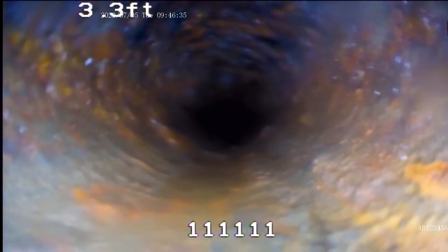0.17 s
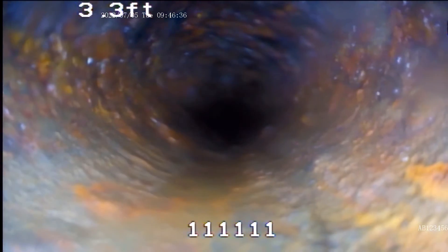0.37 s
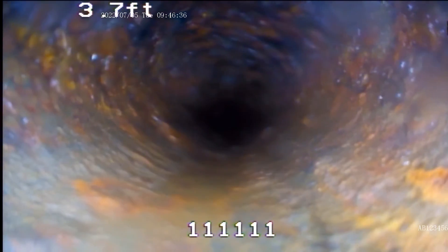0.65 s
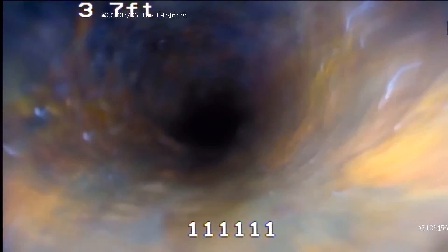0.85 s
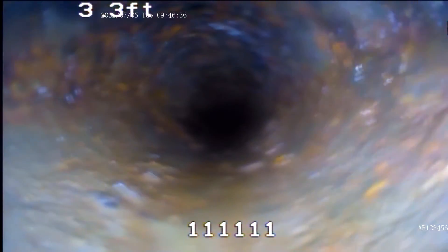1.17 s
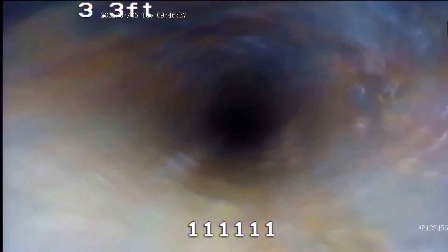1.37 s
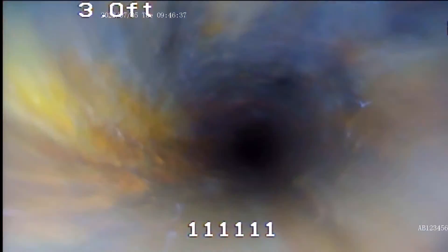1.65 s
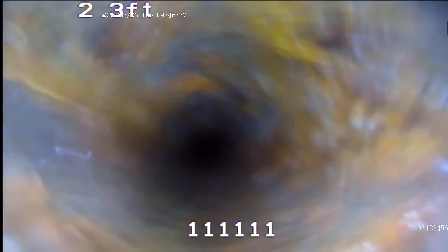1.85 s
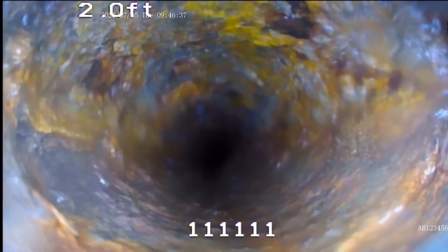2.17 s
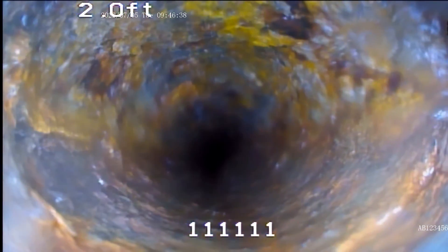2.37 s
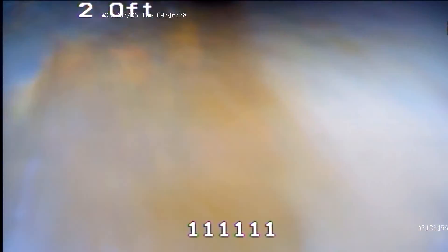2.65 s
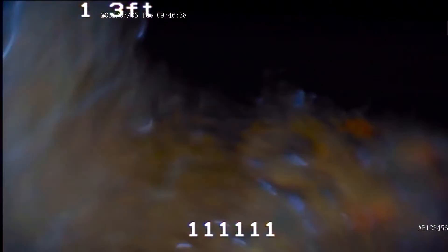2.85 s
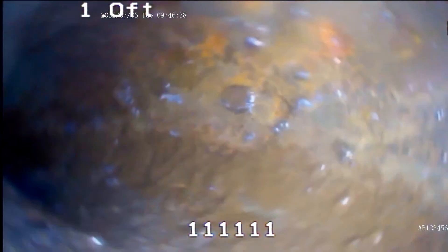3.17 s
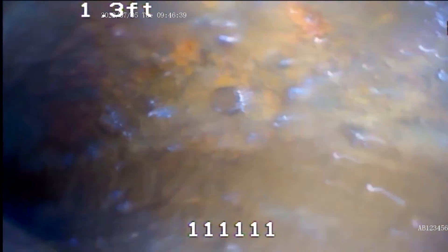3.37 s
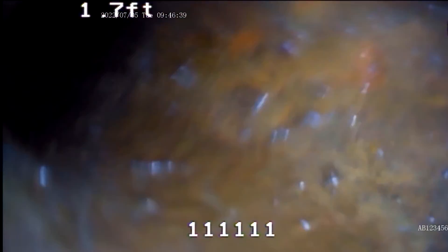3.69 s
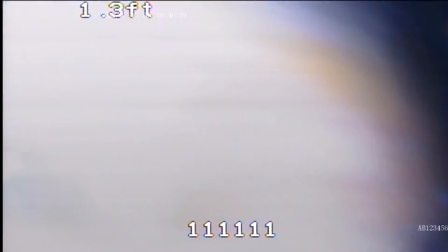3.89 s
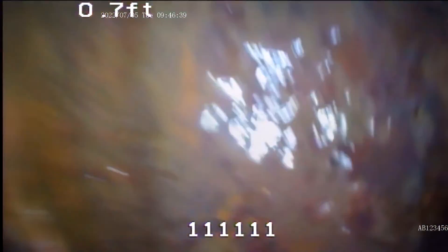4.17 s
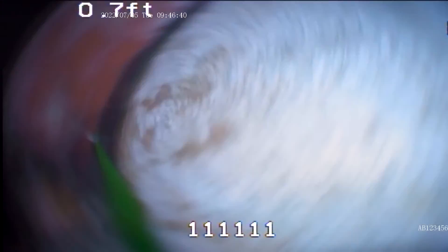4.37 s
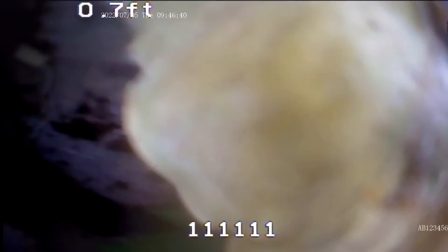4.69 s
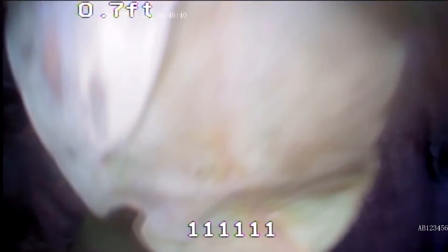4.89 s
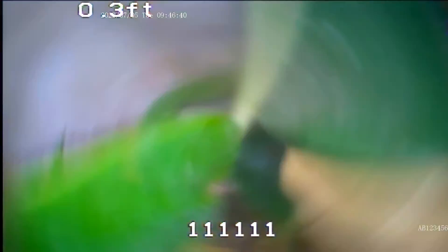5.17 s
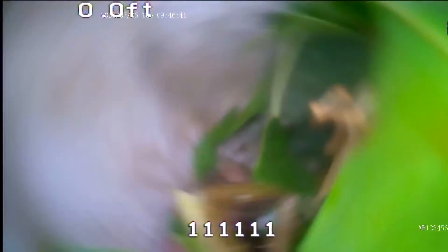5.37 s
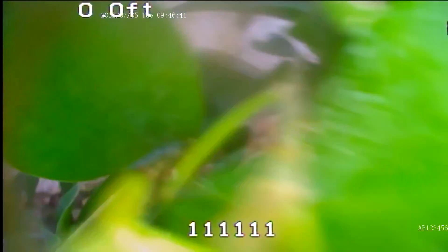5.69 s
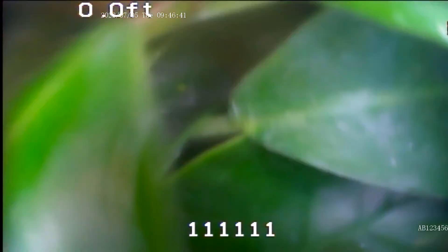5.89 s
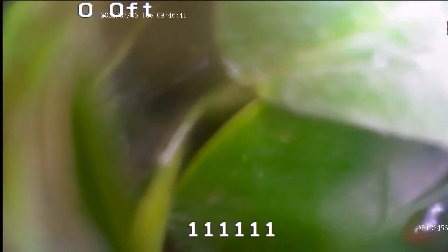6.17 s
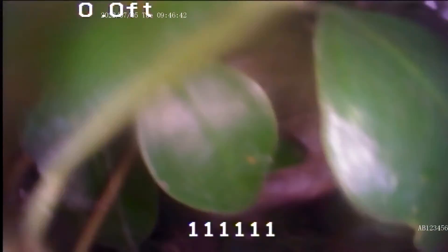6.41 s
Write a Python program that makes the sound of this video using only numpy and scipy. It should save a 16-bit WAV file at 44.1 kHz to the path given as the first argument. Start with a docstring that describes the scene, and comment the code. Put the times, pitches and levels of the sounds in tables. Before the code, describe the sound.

A stiff inspection cable is hauled from a drain pipe onto its reel in uneven strokes, each speeding up and slowing with a dull rub and gritty scrape. The reel rumbles and its frame rings lightly. Strong pulls open the sound, with a soft, low, wavering friction drone, and a hollow knock follows at 0.7 seconds. At 1.2 seconds everything cuts out for a tenth of a second, with a pop at each edge. Another strong scrape comes near 1.8 seconds, and the drone returns on and off until about 4.2. Slack loops knock and shudder against the frame, loudest around 2.8 and 3.9 seconds, with a quick clatter from 4.3 to 4.5 and lighter knocks around 5. Longer, smoother rubbing and rumbling run from 5 to 6 seconds, then settle, with one small scrape at 6.5. Faint monitor hiss and a very thin whine lie underneath.

```python
"""At a drain pipe, a stiff inspection cable is hauled out in strokes, back onto its reel.
Each pull speeds up, holds and slows, rubbing and scraping through the guide and bowing the reel
into a drone. The reel rumbles as it turns, its frame rings, and slack loops knock against it
and shudder. The monitor adds faint hiss and a thin whine; once, the sound cuts out for a moment."""
import sys
import numpy as np
from scipy import signal
from scipy.fft import rfft, irfft
from scipy.io import wavfile
from scipy.ndimage import uniform_filter1d

SR = 44100
rng = np.random.default_rng(int(sys.argv[2]) if len(sys.argv) > 2 else 0)


def inscribe(sig):
    """Save sig as 16-bit PCM at rate SR to the path in sys.argv[1].

    A 1-D sig is mono; a 2-D sig holds one channel per row.
    Samples are clipped to [-1, 1] before scaling.
    """
    pcm = np.round(np.clip(np.atleast_2d(sig).T, -1, 1) * 32767)
    wavfile.write(sys.argv[1], SR, pcm.astype(np.int16))


N = 288414
TIME = np.arange(N) / SR
CONTROL_TIME = np.arange(0, N / SR + .002, .002)  # coarse grid for envelopes

# Pulls through the guide; levels are relative within each layer:
# full speed at t/s, rise/s, hold/s, fall/s, rub/dB, scrape/dB, hiss/dB, ring/dB
PULLS = [(0.033, 0.048, 0.062, 0.13, -33.5, -33, -60, -44.5),
         (0.22, 0.18, 0.14, 0.14, -44.5, -61.5, -81, -65),
         (0.42, 0.086, 0.055, 0.12, -41, -44, -74.5, -57.5),
         (0.51, 0.1, 0.034, 0.13, -34, -46.5, -70.5, -44.5),
         (0.712, 0.069, 0.027, 0.5, -36, -55, -75.5, -63),
         (1.12, 0.19, 0.016, 0.19, -40.5, -50, -71, -56.5), (1.32, .1, 0.13, 0.36, -44, -57, -77, -55.5),
         (1.778, .24, 0.073, 0.076, -35, -40.5, -66.5, -55),
         (1.93, .1, 0.011, 0.46, -49, -56.5, -79, -65.5), (2.38, 0.11, 0.061, 0.15, -51, -59.5, -97, -67),
         (2.82, 0.21, 0.15, 0.064, -46, -46, -71, -50), (3.164, .05, 0.021, 0.22, -49.5, -73, -92, -75),
         (3.4, 0.066, 0.04, 0.16, -37, -44.5, -64.5, -58),
         (3.763, 0.1, .12, 0.18, -47.5, -55.5, -78, -70.5),
         (3.964, .05, 0.053, 0.19, -41.5, -49.5, -77.5, -53.5),
         (4.32, 0.23, 0.12, 0.24, -39.5, -52, -71.5, -57),
         (4.657, .08, 0.046, 0.059, -45.5, -65.5, -80.5, -74),
         (5.085, 0.27, 0.55, 0.21, -42.5, -60, -78, -59.5),
         (5.542, 0.32, 0.25, 0.14, -39, -55.5, -74.5, -63),
         (6.19, 0.092, 0.047, 0.32, -61, -94.5, -99, -73),
         (6.53, 0.02, 0.022, 0.11, -63, -54.5, -70.5, -63)]
# Slack loops hitting the frame, relative levels: t/s, thud/dB, clack/dB, tick/dB, hollow note f/Hz
KNOCKS = [(0.699, -46.5, -43.5, -71, 426), (0.709, -32.5, -34, -46, 368), (1.433, -38.5, -48, -72, 466),
          (1.463, -45, -34.5, -55.5, 247), (2.041, -53, -48, -90, 322), (2.384, -36, -46, -67, 405),
          (2.419, -27.5, -28.5, -37.5, 490), (2.827, -20.5, -23.5, -36, 540),
          (2.948, -24.5, -36.5, -54, 403), (2.982, -30, -58, -78, 408), (3.0, -30.5, -39, -71, 363),
          (3.125, -41, -48.5, -65, 250.3), (3.329, -35, -43.5, -66, 470), (3.375, -51, -40.5, -78, 364.6),
          (3.387, -32, -35, -48, 293), (3.814, -64.5, -64, -62.5, 404), (3.917, -39, -37, -58.5, 448),
          (3.926, -23, -22.5, -39.5, 516), (3.949, -30, -37, -43.5, 490), (3.956, -26, -32, -65, 520),
          (4.093, -47, -50.5, -64, 400), (4.126, -49, -48.5, -69, 282), (4.155, -32.5, -61, -76, 275),
          (4.29, -39, -46.5, -79, 486), (4.338, -30, -35.5, -72, 524), (4.352, -32, -25.5, -40.5, 480),
          (4.361, -51, -31, -44.5, 400), (4.387, -27.5, -45, -45.5, 463), (4.422, -36.5, -36, -71, 466),
          (4.443, -33, -38, -52, 544), (4.455, -29, -40.5, -52, 540), (4.552, -37.5, -52.5, -66.5, 424),
          (4.963, -38.5, -41, -69, 412), (5.001, -55, -48, -84, 460), (5.056, -38, -46.5, -87, 420),
          (5.082, -31, -38.5, -66, 520), (5.194, -33, -53, -75, 433), (5.249, -35.5, -45, -72.5, 516),
          (6.169, -59.5, -71.5, -96, 330)]
# Broad body tone of cable and frame: f/Hz, gain/dB
BODY_TONE = [(25, -29), (50, -23), (70, -6.5), (92, 0), (135, -10), (220, -8.5), (520, -14.5), (680, -22.5),
             (850, -23), (1080, -20), (1600, -26), (2400, -30.5), (3300, -35), (4200, -45), (8000, -58.5),
             (13000, -71.5)]


def cable_drag(rumble, rub, scrape, hiss):
    """Slips of the cable shake the frame: slow bumps rumble and rub, fine dense grit scrapes."""
    # Scrape spectrum of the cable jacket in the guide: f/Hz, gain/dB
    jacket_tone = [(800, 0), (1050, -7), (1330, 4.5), (1700, 1), (2200, -6), (2450, -10.5), (3300, -16),
                   (4000, -21.5), (4900, -27.5), (5700, -28), (7400, -35.5), (9000, -36.5), (13000, -49.5)]
    bumps = slips(per_s=300, spread_db=0.26, smooth=1.0)
    bumps = signal.oaconvolve(bumps, frame_response(BODY_TONE, ring_db=-1))[:N]
    bumps = sliding_contact(bumps, depth_db=3, size=4096)
    grit = slips(per_s=2600, spread_db=2.8, smooth=.8) * amp(1.3 * wander(35))
    grit = signal.oaconvolve(grit, frame_response(jacket_tone, ring_db=-2))[:N]
    grit = sliding_contact(grit, depth_db=2.8, size=2048)
    rasp = hiss * np.sqrt(hiss / amp(-57))  # comes forward on the hardest pulls
    out = amp(2.6) * rumble * steadied(band(bumps, 67, 190), 0.074)
    out += amp(-1.0) * rub * steadied(band(bumps, 248, 661, order=4), 0.26)
    out += amp(-1.6) * scrape * steadied(band(grit, 750, 3900, order=4), 0.17)
    out += amp(-0.5) * rasp * steadied(band(grit, 4400, 5400), 0.12)
    return out + amp(-0.5) * hiss * steadied(band(grit, 4500, 15000), 0.54)


def drag_envelopes(let_go_s=6.04, settle_db_per_s=37.5):
    """Pulls, reel turns and knocks drive the levels of rumble, rub, scrape and hiss."""
    # Reel turns taking up the slack: full speed at t/s, rise/s, hold/s, fall/s, relative rumble/dB
    reel_turns = [(0.215, 0.14, 0.21, 0.21, -37), (0.584, 0.053, 0.04, 0.15, -33),
                  (0.955, 0.24, 0.44, .25, -34.5), (1.584, 0.065, 0.072, 0.28, -36.5),
                  (2.995, 0.058, 0.043, 0.087, -42), (3.41, 0.16, 0.09, 0.26, -44),
                  (4.797, 0.019, 0.011, 0.038, -46.5), (5.292, 0.24, 0.29, .12, -34),
                  (5.551, 0.082, 0.27, .15, -33.5)]
    rub_db, scrape_db, hiss_db = np.transpose(PULLS)[4:7]
    thud_db, clack_db = np.transpose(KNOCKS)[1:3]
    # The frame trembles for as long as the cable is handled.
    tremor = amp(-55 - settle_db_per_s * np.maximum(TIME - let_go_s, 0))
    rolling = swells(reel_turns, np.transpose(reel_turns)[-1])
    low_shake = shudder(thud_db - 9.5, build_s=0.035, decay_db_per_s=94)
    mid_shake = shudder(thud_db - 4, build_s=0.036, decay_db_per_s=190)
    rattle = shudder(clack_db - 8.5, build_s=0.0092, decay_db_per_s=340)
    rumble = np.sqrt(rolling ** 2 + low_shake ** 2 + tremor ** 2)
    rub = np.hypot(swells(PULLS, rub_db, steepness=0.86), mid_shake)
    scrape = np.hypot(swells(PULLS, scrape_db), rattle)
    hiss = swells(PULLS, hiss_db, steepness=1.05)
    return rumble, rub, scrape, hiss


def slips(per_s, spread_db, smooth):
    """Friction force: tiny slips of uneven size over a smooth sliding noise."""
    sizes = amp(spread_db * np.minimum(rng.exponential(1, N), 4)) * rng.standard_normal(N)
    slipping = rng.random(N) < per_s / SR
    return unit_rms(sizes * slipping) + smooth * rng.standard_normal(N)


def sliding_contact(x, depth_db, size):
    """The contact point travels along the cable, so narrow resonances come and go."""
    spectra = signal.stft(x, nperseg=size)[2]
    patches = uniform_filter1d(rng.standard_normal(spectra.shape), size=4, axis=0)
    patches = uniform_filter1d(patches, size=4, axis=1)
    return signal.istft(spectra * amp(depth_db * unit_rms(patches)), nperseg=size)[1][:N]


def frame_response(tone, ring_db, spread_db=0, size=16384):
    """Impulse response of the frame; with spread_db, each contact point weights the modes anew."""
    # Modes of the reel frame: f/Hz, width/Hz, relative peak/dB
    modes = [(113, 8, 11), (178, 14, 6), (313, 16, 5), (428, 18, 7), (474, 16, 7), (535, 26, 5),
             (740, 18, 12), (1062, 36, 18), (1268, 22, 13), (1430, 35, 7), (1654, 25, 3), (1796, 30, 4),
             (1983, 35, 6), (2178, 60, 12), (2534, 40, 6), (2715, 65, 6), (3170, 90, 5), (5000, 200, 6),
             (6550, 200, 6), (7550, 350, 6)]
    hz = np.fft.rfftfreq(size, 1 / SR)
    weights = amp(ring_db + spread_db * rng.standard_normal(len(modes)))
    peaks = sum((weight * amp(db)) ** 2 / (1 + (2 * (hz - mode_hz) / width) ** 2)
                for weight, (mode_hz, width, db) in zip(weights, modes))
    log_gain = np.log(eq_gain(tone, hz) * np.sqrt(1 + peaks))
    mirrored = np.r_[log_gain, log_gain[-2:0:-1]]
    minimum_phase = np.exp(np.conj(signal.hilbert(mirrored)))
    return np.fft.ifft(minimum_phase).real[:size // 2]


def reel_singing(ring_hz=1062, ring_lag_s=0.033):
    """The sliding cable bows the reel into a soft, wavering drone and a rough higher ring."""
    # Spells of bowing: full strength at t/s, rise/s, hold/s, fall/s, relative level/dB, pitch f/Hz
    spells = [(0.0, 0.17, 0.25, 0.054, -39.5, 172), (0.39, 0.038, 0.033, 0.083, -32.5, 171.9),
              (0.525, 0.066, 0.034, .07, -35.5, 169), (1.706, 0.089, 0.14, .12, -33.5, 173.8),
              (1.967, 0.16, .1, 0.45, -43, 179.7), (2.439, 0.059, 0.027, .12, -37, 179.6),
              (2.68, 0.14, 0.11, .1, -42, 177), (2.859, 0.18, .06, 0.14, -31.5, 182),
              (3.426, 0.16, 0.17, 0.039, -40.5, 180), (3.735, 0.061, 0.2, 0.37, -39.5, 176)]
    # Partials of the drone, before tuning to each spell's pitch: f/Hz, relative level/dB
    partials = [(177, 0), (352, -19), (474, -16), (770, -21)]
    full_s, _, hold_s, _, drone_db, pitch_hz = np.transpose(spells)
    grip = swells(spells, drone_db) * amp(1.7 * wander(11))  # the grip comes and goes
    tuning = np.interp(TIME, full_s + hold_s / 2, pitch_hz) / partials[0][0]
    drone = sum(amp(db) * bowed_tone(hz * tuning) for hz, db in partials)
    pull = swells(PULLS, np.transpose(PULLS)[-1], steepness=0.84)
    ring_level = np.interp(TIME - ring_lag_s, TIME, pull)  # builds up behind the pull
    ring = steadied(shaped_noise(lambda hz: 1 / (1 + ((hz - ring_hz) / 30) ** 2)), .12)
    flutter = amp(1 + 3.5 * wander(21))  # the ring catches and lets go
    return amp(0.5) * grip * drone + flutter * ring_level * ring


def bowed_tone(hz, drift_hz=6, flutter_db=2.2):
    """Friction keeps one resonance going; its pitch drifts and its level flutters."""
    cycles = np.cumsum(hz + drift_hz * wander(8.61)) / SR
    return unit_rms(amp(flutter_db * wander(46)) * np.sin(2 * np.pi * cycles))


def loop_knocks(softening_db=39.5):
    """Slack loops hit the frame; the more thud outweighs clack, the longer the contact."""
    out = np.zeros(N)
    for at_s, thud_db, clack_db, tick_db, hollow_hz in KNOCKS:
        contact_s = max(.0031 * 2 ** ((thud_db - clack_db) / softening_db), .0018)
        add(out, at_s - 0.00153, knock((thud_db, clack_db, tick_db), hollow_hz, contact_s))
    return amp(-2.2) * out


def knock(levels_db, hollow_hz, contact_s, lag_s=0.002482, size=16384):
    """A loop presses and chatters on the frame; bending waves carry the treble ahead of the bass."""
    t = np.arange(size) / SR
    contact = t / contact_s
    press = contact * np.exp(1 - contact) + amp(-14) * (1 - np.exp(-contact)) * np.exp(-t / .015)
    hz = np.fft.rfftfreq(size, 1 / SR)
    bending = np.exp(-4j * np.pi * lag_s * np.sqrt(hz * 400))  # delay is lag_s at 400 Hz
    hollow = 1 + 3.7 / (1 + 1j * (hz - hollow_hz) / 55)  # each loop has its own note
    body = rfft(frame_response(BODY_TONE, ring_db=-1, spread_db=2.5), size)
    chatter = rfft(press * rng.standard_normal(size))
    hit = irfft(chatter * body * hollow * bending)
    thud, clack, tick = band(hit, 150, 800), band(hit, 800, 3000), band(hit, 3000, 15000)
    attack = slice(SR // 40)
    return sum(amp(db) * part / np.std(part[attack]) for db, part in zip(levels_db, (thud, clack, tick)))


def shudder(levels_db, build_s, decay_db_per_s):
    """Envelope of the shaking that each knock leaves in the cable, in proportion to the blow."""
    power = 0
    for (at_s, *_), db in zip(KNOCKS, levels_db):
        age = np.maximum(CONTROL_TIME - at_s, 0)
        power += (np.minimum(age / build_s, 1) * amp(db - decay_db_per_s * age)) ** 2
    return np.interp(TIME, CONTROL_TIME, np.sqrt(power))


def monitor(whine_hz=15626):
    """A low noise bed, electronic hiss and the line whine of the screen."""
    # Spectrum of the low bed and hiss: f/Hz, relative level/dB
    hiss_tone = [(20, 34), (45, 34.5), (70, 29.5), (150, 16), (500, 13.5), (1500, 3.5), (4000, -5.5),
                 (9000, -7), (15500, -7.5)]
    hiss = shaped_noise(lambda hz: eq_gain(hiss_tone, hz))
    return amp(-63.0) * hiss + amp(-89.5) * np.sin(2 * np.pi * whine_hz * TIME)


def swells(moves, levels_db, steepness=1):
    """Envelope of moves that speed up, hold and slow; a rise or fall spans 20 dB times steepness."""
    power = 0
    for (full_s, rise_s, hold_s, fall_s, *_), db in zip(moves, levels_db):
        rising = (full_s - CONTROL_TIME) / rise_s
        falling = (CONTROL_TIME - full_s - hold_s) / fall_s
        slowness = np.maximum(np.maximum(rising, falling), 0)
        power += amp(db - steepness * 20 * slowness) ** 2
    return np.interp(TIME, CONTROL_TIME, np.sqrt(power))


def steadied(x, span_s):
    """Levels out swings slower than span_s."""
    size = int(span_s * SR)
    power = signal.oaconvolve(x ** 2, np.hanning(size) * 2 / size, "same")
    return x / np.sqrt(abs(power) + 1e-9)


def wander(rate_hz):
    """Slow random modulation of rms 1."""
    return shaped_noise(lambda hz: np.exp(-(hz / rate_hz) ** 2))


def shaped_noise(gain):
    """Noise of rms 1 with the spectrum gain(hz)."""
    spectrum = rfft(rng.standard_normal(N)) * gain(np.fft.rfftfreq(N, 1 / SR))
    return unit_rms(irfft(spectrum, N))


def band(x, lo_hz, hi_hz, order=3):
    """Causal band-pass."""
    return signal.sosfilt(signal.butter(order, [lo_hz, hi_hz], "band", fs=SR, output="sos"), x)


def eq_gain(curve, hz):
    """Gain of an EQ curve, interpolated on a log-frequency axis."""
    points_hz, db = np.transpose(curve)
    return amp(np.interp(np.log(hz + 1), np.log(points_hz + 1), db))


def add(mix, at_s, sound):
    """Mixes a sound in at a given time."""
    part = mix[max(round(at_s * SR), 0):][:len(sound)]
    part += sound[:len(part)]


def unit_rms(x):
    """Scales to rms 1."""
    return x / np.sqrt(np.mean(x ** 2) + 1e-20)


def amp(db):
    """Decibels to gain."""
    return 10 ** (np.asarray(db) / 20)


def scene():
    """Cable, reel and monitor in a mono mix."""
    return (cable_drag(*drag_envelopes()) + reel_singing() + loop_knocks() + monitor())[None]


def record(dry):
    """The signal drops out briefly with a pop at each edge; a low-pass trims the top."""
    cut_s, back_s, pop_s, fade_s = 1.2015, 1.3172, 0.00085, 0.00098
    outside_s = np.maximum(cut_s - TIME, TIME - back_s)
    gate = np.clip(outside_s / fade_s, 0, 1)
    pops = 0.051 * np.exp(-abs(outside_s) / pop_s) * (outside_s > 0)
    low_pass = signal.firwin(511, 15850, window=("kaiser", 9), fs=SR)
    return signal.oaconvolve(dry * gate + pops, low_pass[None], "same", axes=1)


dry = scene()
out = record(dry)
inscribe(out)
```